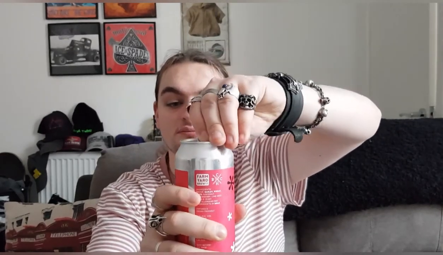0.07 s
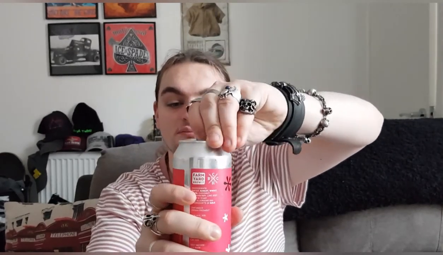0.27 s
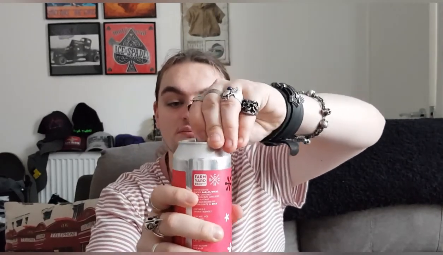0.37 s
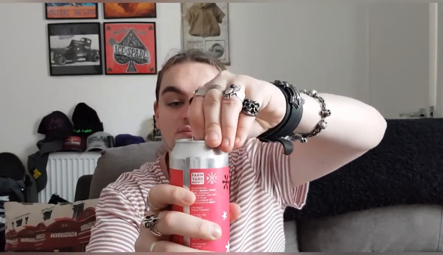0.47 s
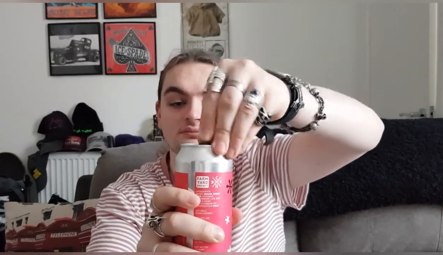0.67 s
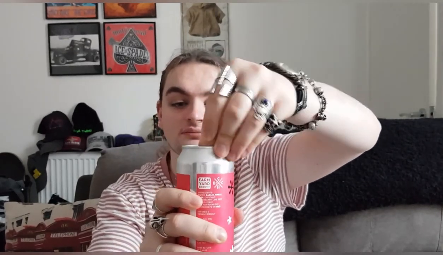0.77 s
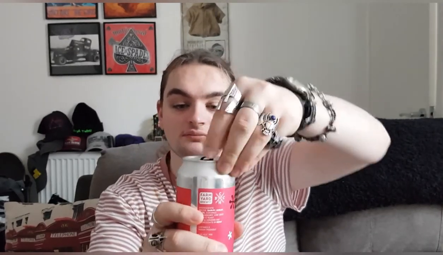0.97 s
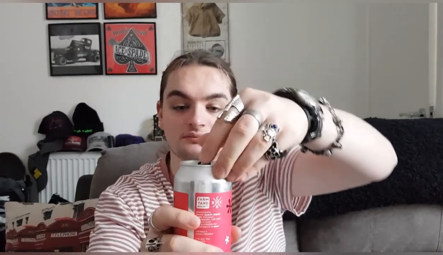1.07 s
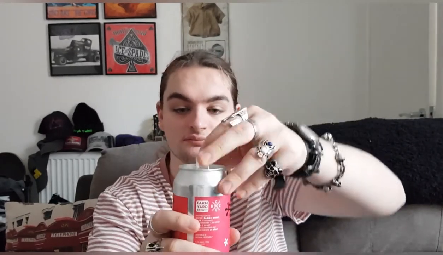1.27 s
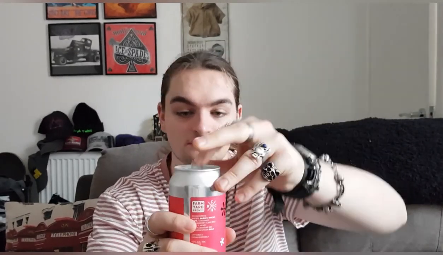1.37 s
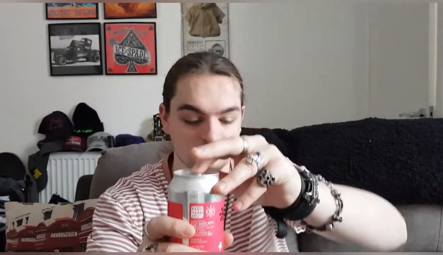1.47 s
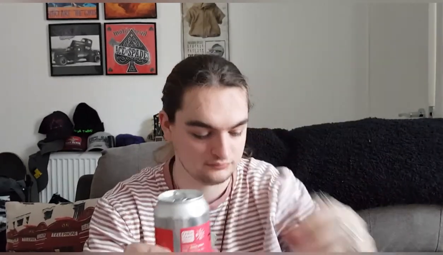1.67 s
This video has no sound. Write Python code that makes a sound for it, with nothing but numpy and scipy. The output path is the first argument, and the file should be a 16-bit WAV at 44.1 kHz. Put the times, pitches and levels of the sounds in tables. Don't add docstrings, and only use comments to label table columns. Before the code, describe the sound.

An aluminium drinks can opens: after near quiet, rapid metallic tearing ticks from 0.19 s end in a loud, hollow pop at 0.22 s, with a brief gas hiss fading by about 0.4 s. Faint clicks and rubs follow at 0.54-0.75, then firmer hollow knocks with clinks at 0.91, 1.20 and 1.39, and tiny taps near 1.5. Small room echo, low hiss and hum, close stereo phone.

```python
import sys
import numpy as np
from scipy import signal
from scipy.fft import rfft, irfft
from scipy.io import wavfile
from scipy.ndimage import uniform_filter1d, map_coordinates

SR = 44100
rng = np.random.default_rng(int(sys.argv[2]) if len(sys.argv) > 2 else 0)


def decibels_to_gain(level_db):
    exponent = np.asarray(level_db, float) / 20
    return 10 ** exponent


def waveform_to_disk(signal):
    frames = np.transpose(np.atleast_2d(signal))
    scaled = np.clip(frames, -1, 1) * 32767
    samples = np.round(scaled).astype(np.int16)
    wavfile.write(sys.argv[1], SR, samples)


N = 74970


def curve(table, hz):
    points = np.array(table, float)
    return np.interp(np.log(np.maximum(hz, 1)), np.log(points[:, 0]), points[:, 1])


def colour(x, table):
    n = x.shape[-1]
    hz = np.arange(n // 2 + 1) * SR / n
    return irfft(rfft(x) * decibels_to_gain(curve(table, hz)), n)


def band(x, hz, width):
    return signal.lfilter(*signal.iirpeak(min(hz, .45 * SR), hz / width, fs=SR), x)


def decay(t, t60):
    return np.exp(-np.log(1000) * t / t60)


def ring(at, db, hz, t60, swell=1.11):
    out = np.zeros(N)
    start = int(at * SR)
    t = np.maximum(np.arange(start, min(N, start + SR // 5)) / SR - at, 0)
    onset = (1 - np.exp(-t * hz * swell)) ** 2
    tone = np.sin(2 * np.pi * hz * t)
    out[start:start + len(t)] = decibels_to_gain(db) * tone * onset * decay(t, np.clip(t60, .002, .15))
    return out


# (frequency [Hz], level per Hz [dB])
HISS = [(28, -23.5), (55, -5), (200, -17), (700, -21.5), (2500, -35), (4600, -30.5), (8000, -44.5),
        (12000, -24), (16000, -24.5)]
# (frequency [Hz], side minus mid [dB])
HISS_SIDE = [(60, -8.5), (110, -2.5), (200, -6.5), (380, -4), (700, 1), (1290, 3), (2380, 0.5), (4400, 3),
             (8120, -10), (15000, -20.5)]
HUM_HZ = [46, 320, 638, 1139, 548, 183, 229, 63, 128]
# (level [dB], left minus right [dB])
HUM_LEVELS = [(-74.5, 11.5), (-85.5, -3.5), (-89.5, -2), (-88.5, 2.5), (-91.5, 1), (-87.5, -0.5),
              (-87, 5.5), (-85.5, 5), (-87.5, 4)]


def background():
    hiss_db, hum_db, waver_db = -71.5, 5.0, -2.5
    mid, side = colour(rng.standard_normal((2, N)), HISS)
    side = colour(side, HISS_SIDE)
    out = np.array([mid + side, mid - side]) * decibels_to_gain(hiss_db) / mid.std()
    t = np.arange(N) / SR
    for hz, (db, pan_db) in zip(HUM_HZ, HUM_LEVELS):
        wander = uniform_filter1d(rng.standard_normal(N), size=3000)
        drift = np.cumsum(wander) * (250 + hz / 8) / SR
        waver = uniform_filter1d(rng.standard_normal(N), size=2500) * np.sqrt(2500)
        tone = decibels_to_gain(db + hum_db + waver_db * waver) * np.sin(2 * np.pi * (hz * t + drift))
        out = out + tone * decibels_to_gain(np.array([[pan_db], [-pan_db]]) / 2)
    shift_db, shift_hz, middle_s, half_s = -78.5, 170, .98, .17
    rumble = band(rng.standard_normal(N), shift_hz, shift_hz)
    return out + decibels_to_gain(shift_db) * rumble / rumble.std() * np.exp(-((t - middle_s) / half_s) ** 2)


# (frequency [Hz], level [dB], t60 [s])
SHELL_MODES = [(851, 0, 0.19), (970.6, -3.5, 0.17), (1043, -9.5, .16), (1162, -9, .15), (1192, -2, 0.22),
               (1275, 1.5, .15), (1554, -12, .2), (1740, -7, .22), (1950, -1.5, .2), (2118, -1, .2),
               (2830, -4.5, .22), (3260, -12.5, .22), (3700, -8, 0.19), (6250, -15.5, .22)]


def shell(x):
    level_db, spread_rad, build_s = -10.5, 0.39, 0.015
    t = np.arange(SR // 2) / SR
    steps = spread_rad * rng.standard_normal(len(SHELL_MODES))
    ports = np.array([[1], [-1]])
    rings = 0
    for (hz, db, t60), step in zip(SHELL_MODES, steps):
        rings = rings + decibels_to_gain(db) * np.sin(2 * np.pi * hz * t + step * ports) * decay(t, t60)
    rings = rings * (1 - np.exp(-t / build_s))
    rings = rings / np.sqrt(np.mean(np.sum(rings ** 2, axis=1)))
    return decibels_to_gain(level_db) * signal.fftconvolve(x[None], rings)[:, :N]


# (frequency [Hz], t60 [s])
ROOM_T60 = [(250, 0.15), (700, 0.41), (1500, .3), (3500, 0.27), (7000, 0.4), (13000, 0.19)]
# (frequency [Hz], level [dB])
ROOM_COLOUR = [(300, -2), (620, -2), (820, -5.5), (1050, -3.5), (2500, 5.5), (5000, -2.5), (9000, 1),
               (14000, -0.5)]


def room(x):
    level_db, side_db, alike_hz = 2.5, -0.5, 600
    gap_s, build_s, thicken_s = .0015, 0.0045, 0.037
    t = np.arange(SR) / SR
    late = np.maximum(t - gap_s, 0)
    sparse = np.exp(0.76 * rng.standard_normal(SR) * np.exp(-late / thicken_s))
    mid, side = rng.standard_normal((2, SR)) * sparse * (1 - np.exp(-late / build_s))
    side = decibels_to_gain(side_db) * signal.lfilter(*signal.butter(2, alike_hz, "high", fs=SR), side)
    both = np.array([mid + side, mid - side])
    tail = 0
    for hz in 200 * 2 ** np.arange(0, 6.4, .7):
        tail = tail + band(both, hz, hz / 2) * decay(t, curve(ROOM_T60, hz))
    tail = tail / np.sqrt(np.mean(np.sum(tail ** 2, axis=1)))
    return decibels_to_gain(level_db) * signal.fftconvolve(colour(x, ROOM_COLOUR)[None], tail)[:, :N]


# (time [s], level [dB], frequency [Hz], width [Hz])
UPWARD = [(0.9135, -35, 6200, 3950), (0.917, -33, 4200, 1200), (1.2012, -43, 10900, 6100),
          (1.3888, -61, 7560, 3000), (1.389, -53, 11500, 5000), (1.3885, -24, 14500, 3000)]


def upward():
    out = np.zeros(N)
    for at, db, hz, width in UPWARD:
        click = 1. * (np.arange(N) == int(at * SR))
        out = out + decibels_to_gain(db) * band(click, hz, width)
    return out


# (start [s], length [s], level [dB], frequency [Hz], width [Hz])
SLIDES = [
    (0.62, 0.04, -60, 978, 60),
    (1.564, 0.048, -79, 2000, 294),
    (1.538, 0.11, -82, 4750, 2500),
]


def slides():
    out = np.zeros(N)
    t = np.arange(N) / SR
    for start, length, db, hz, width in SLIDES:
        rub = band(rng.standard_normal(N), hz, width)
        out = out + decibels_to_gain(db) * rub / rub.std() * np.sin(np.pi * np.clip((t - start) / length, 0, 1))
    return out


# (time [s],
# frequency [Hz], t60 [s])
CLINKS = [(.1752, 5000, .012), (.1752, 3700, .006), (.2228, 3450, .008), (.2283, 3850, .008),
          (.5403, 3500, .008), (.5453, 3800, .008), (.5455, 6600, .01), (.584, 5200, .02),
          (.645, 1600, .015), (.650, 1920, .02), (.6475, 5390, .03), (.7490, 6300, .0028),
          (.7493, 9300, .005), (.752, 1750, .025), (.9150, 2500, .006), (.9155, 2860, .02),
          (.9165, 1750, .008), (.942, 2850, .015), (1.1955, 5000, .008), (1.2013, 3250, .02),
          (1.2012, 6200, .02), (1.2015, 2150, .015), (1.214, 9550, .015), (1.389, 11900, .003),
          (1.4955, 2100, .006), (1.544, 2200, .015), (1.59, 1900, .02), (1.2014, 1955, .09),
          (1.2014, 3265, .09), (1.2014, 4380, .08), (1.2014, 5200, .06), (1.2014, 6120, .1),
          (.7490, 1150, .005), (.666, 1650, .025), (.9155, 2835, .12), (.5352, 3700, .006)]
CLINK_DB = [-60, -49, -19, -14.5, -47, -45, -75, -60, -46, -54, -54.5, -46, -56, -61.5, -39, -55.5, -83,
            -51, -46, -54, -43, -79, -50, -47, -47.5, -80, -62, -56.5, -69, -55, -43, -48, -49, -61, -70,
            -70]


def clinks():
    return sum(ring(at, db, hz, t60, 1.0) for (at, hz, t60), db in zip(CLINKS, CLINK_DB))


SMEAR_S = .00025
SCATTER_DB = 1.5
TICK_S = [.5402, .5452, .586, .6445, .651, .7490, .9160, 1.2009, 1.2065, 1.3883]
# (level [dB], tilt [dB per octave])
TICKS = [(-54.5, 7.5), (-58, 0.5), (-88.5, -13), (-56, -4), (-55, 3.5), (-58, 3.5), (-68.5, -10),
         (-36.5, -4.5), (-47, 0.5), (-32.5, -4)]
TICK_LONG = [1, 1, 1, 1, 1, .6, 1.5, 1.3, 1.3, .55]
# (frequency [Hz], level [dB], t60 [s])
TAB = [(1738, -9.5, 0.0094), (2210, -7.5, 0.0094), (3180, 8.5, 0.0037), (3440, -19.5, 0.013),
       (4330, 2, 0.0056), (4960, 3.5, 0.0067), (6100, 2.5, 0.0041), (7090, 7, 0.0016), (9400, -3, 0.0023),
       (10230, 1.5, 0.0013), (11650, 1.5, 0.0022), (13600, -1, 0.0017)]


def ticks():
    out = np.zeros(N)
    for at, (db, tilt_db), long in zip(TICK_S, TICKS, TICK_LONG):
        for hz, mode_db, t60 in TAB:
            chance = rng.standard_normal()
            level = db + mode_db + tilt_db * np.log2(hz / 4000) + SCATTER_DB * chance
            out = out + ring(at + SMEAR_S * abs(chance), level, hz, t60 * long)
    return out


# (time [s], frequency [Hz], t60 [s])
KNOCKS = [(.5405, 1000, .015), (.5455, 1500, .015), (.6425, 985, .035), (.6485, 978, .045),
          (.7492, 1050, .015), (.9146, 1110, .0078), (.993, 1060, .03), (1.2004, 1110, .009),
          (1.3878, 1060, .007), (1.4950, 1000, .012)]
KNOCK_DB = [-52, -60, -48.5, -63, -48.5, -10.5, -50, -22.5, -23, -49.5]
# (pitch factor [1], level [dB])
BODY_OVERTONES = [(.86, -2), (1.65, -8), (1.95, -13.5), (2.55, -34)]


def knocks():
    out = np.zeros(N)
    for (at, hz, t60), db in zip(KNOCKS, KNOCK_DB):
        out = out + ring(at, db + 15.5, hz, t60, .2)
        for factor, mode_db in BODY_OVERTONES:
            out = out + ring(at, db + mode_db, hz * factor, t60, 0.12)
    return out


# (frequency [Hz], level [dB])
TAP_RADIATION = [(500, -21), (880, 0), (16000, 0.5)]


def taps():
    return colour(clinks() + knocks() + ticks() + slides(), TAP_RADIATION)


# (frequency [Hz], width [Hz], level [dB])
GAS_PEAKS = [(4020, 530, 8), (5650, 1500, -11), (12400, 4800, -20.5)]
GAS_S = [.1872, .189, .205, .217, .23, .25, .3, .45, .62]
GAS_DB = [-80.5, -48, -39, -28.5, -39.5, -34, -51.5, -73, -84.5]


def gas():
    jet = sum(decibels_to_gain(db) * band(rng.standard_normal(N), hz, width) for hz, width, db in GAS_PEAKS)
    flow_db = np.interp(np.arange(N) / SR, GAS_S, GAS_DB, left=-150, right=-150)
    return jet / jet.std() * decibels_to_gain(flow_db)


# (frequency [Hz], level [dB], t60 [s])
POP = [(804.3, -6.5, 0.075), (810, 3.5, 0.011), (747, -10, 0.027), (908, -13, 0.065), (1596, 0.5, 0.0082),
       (1945, -7, 0.0073), (2874, -15.5, 0.022), (4010, -17.5, 0.023), (486, -17, .03)]


def pop():
    at, db = .2174, -13.5
    return sum(ring(at, db + mode_db, hz, t60, 2.7) for hz, mode_db, t60 in POP)


TEAR_S = [.1877, .1891, .1940, .2008, .2032, .2063, .2078, .2117, .2150, .2176]
# (level [dB], ring pitch factor [1])
TEARS = [(-29, 1), (-24, .97), (-27, 1), (-25, 1.04), (-23, 1.04), (-13, 1.03), (-21, 1), (-21, .95),
         (-25, 1), (-4.5, .97)]
# (frequency [Hz], level [dB], t60 [s])
LID = [(3660, -4, 0.0057), (4318, -3, 0.0057), (5700, 2, 0.0041), (6770, -6, 0.003), (9430, -9.5, 0.003),
       (11800, -7, 0.0036), (13114, -12.5, 0.0044), (15200, -7, .003), (2900, -8, 0.0045)]


def tearing():
    out = np.zeros(N)
    for at, (db, factor) in zip(TEAR_S, TEARS):
        for hz, mode_db, t60 in LID:
            chance = rng.standard_normal()
            level = 2.5 + db + mode_db + SCATTER_DB * chance
            out = out + ring(at + SMEAR_S * abs(chance), level, hz * factor, t60, 1)
    return out


SEND_S = [.45, .53, .6, .65, .75, .88, 1.1, 1.3, 1.42, 1.49]
SEND_DB = [-1, -4.5, 5, -4.5, -3.5, -3, -1.5, -1, -1.5, -6]
# (frequency [Hz], left minus right [dB])
PORT_PAN = [(250, -3.5), (1000, 0), (3000, -2), (5000, 1), (9000, 6.5), (13000, 4.5)]
# (frequency [Hz], level [dB])
MIC = [(150, -13), (300, -9.5), (550, 1), (6900, -0.5), (8400, -6.5), (9800, -4), (12000, -3),
       (15500, -8.5)]


def scene():
    can = tearing() + pop() + gas() + taps()
    sent = can * decibels_to_gain(np.interp(np.arange(N) / SR, SEND_S, SEND_DB))
    port_lag_s = .000015
    late = map_coordinates(can, [np.arange(N) - port_lag_s * SR], mode="nearest")
    left = colour(late, [(hz, db / 2) for hz, db in PORT_PAN])
    right = colour(can, [(hz, -db / 2) for hz, db in PORT_PAN])
    heard = np.array([left, right]) + room(sent + upward()) + shell(sent)
    return colour(heard, MIC) + background()


def roll_off(x):
    return signal.sosfilt(signal.butter(12, 16510, fs=SR, output="sos"), x)


def record(dry):
    cut = signal.sosfilt(signal.ellip(8, .2, 34, 15700, fs=SR, output="sos"), dry)
    return roll_off(cut)


dry = scene()
out = record(dry)
waveform_to_disk(out)
```